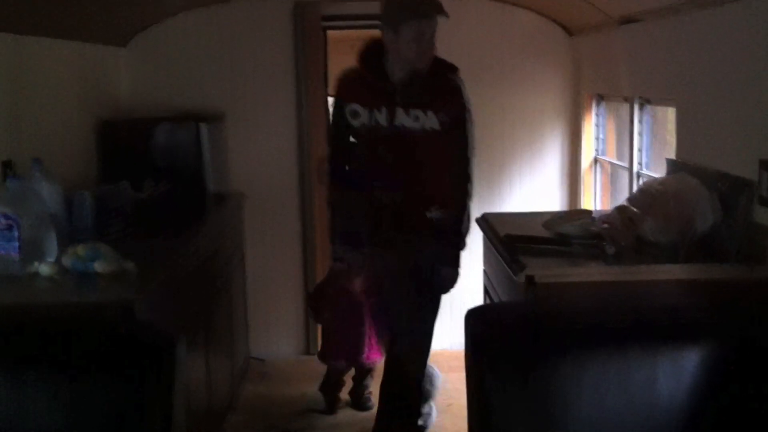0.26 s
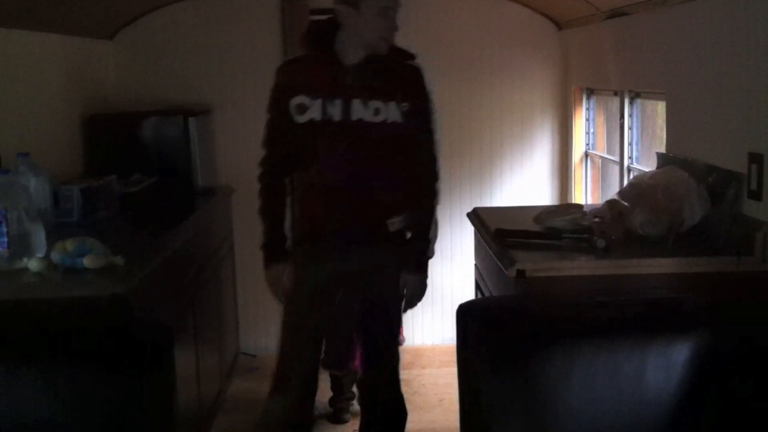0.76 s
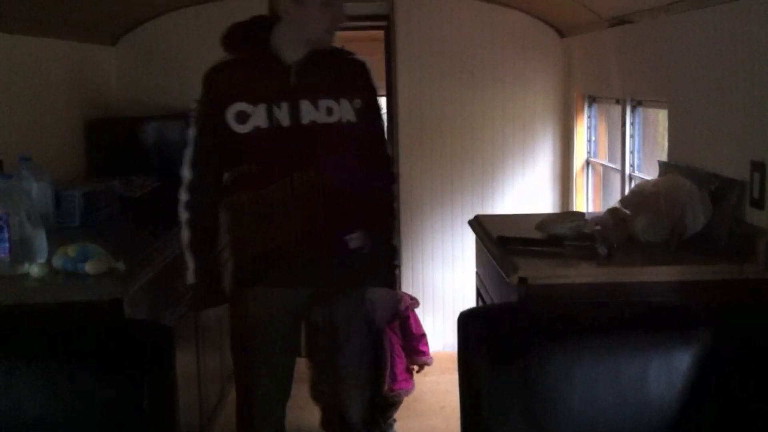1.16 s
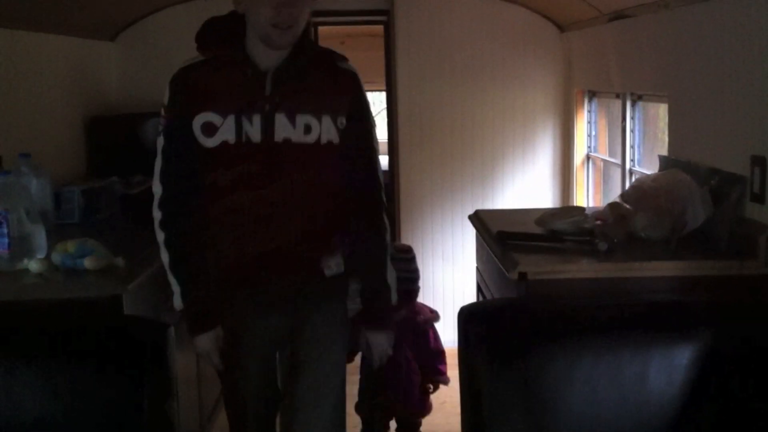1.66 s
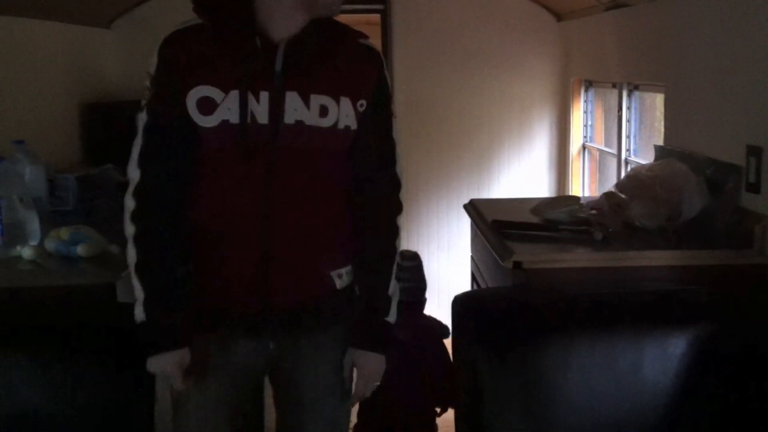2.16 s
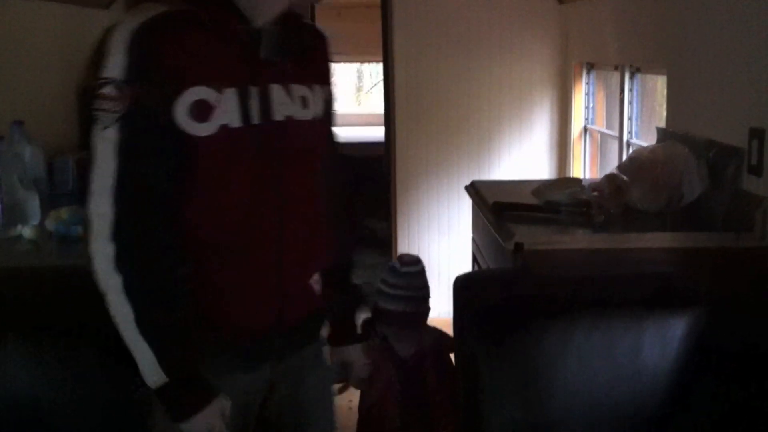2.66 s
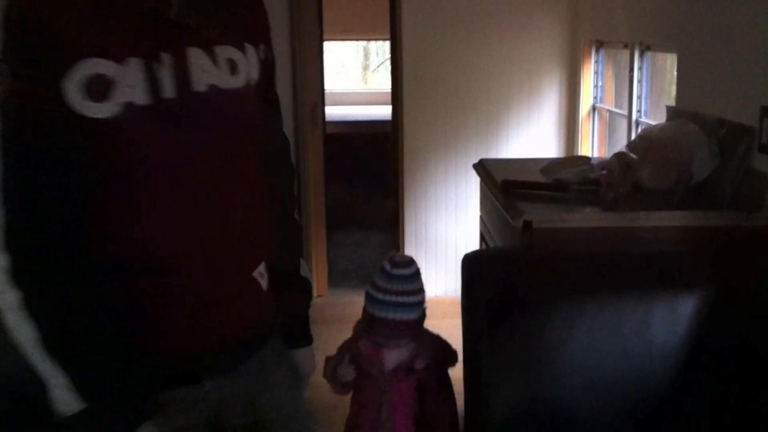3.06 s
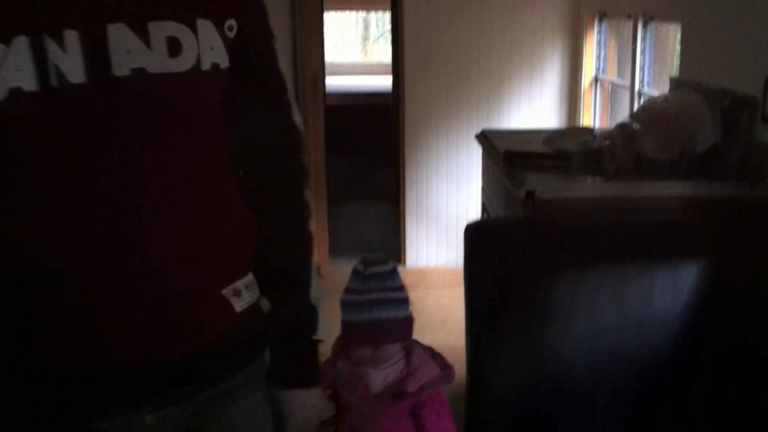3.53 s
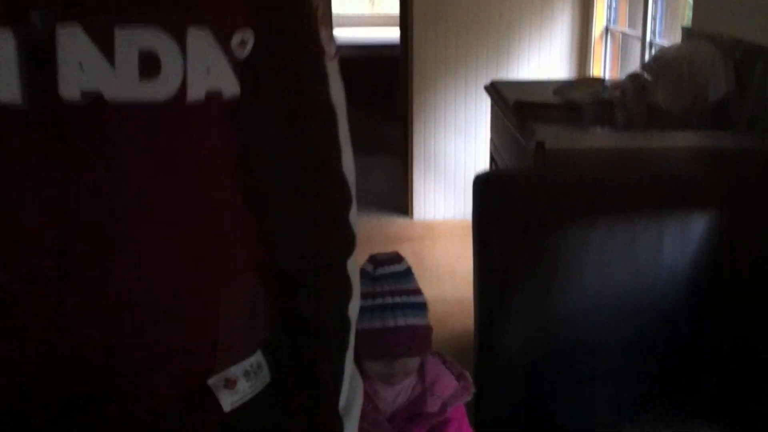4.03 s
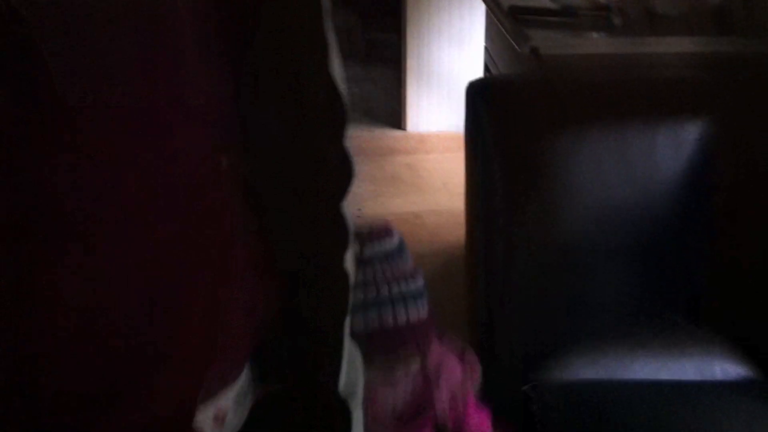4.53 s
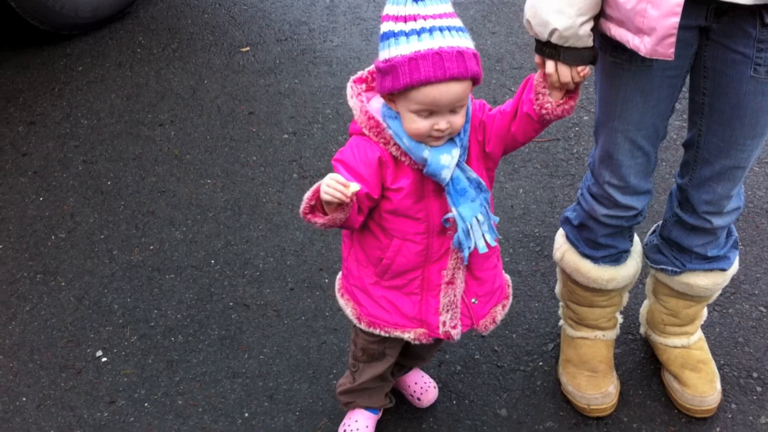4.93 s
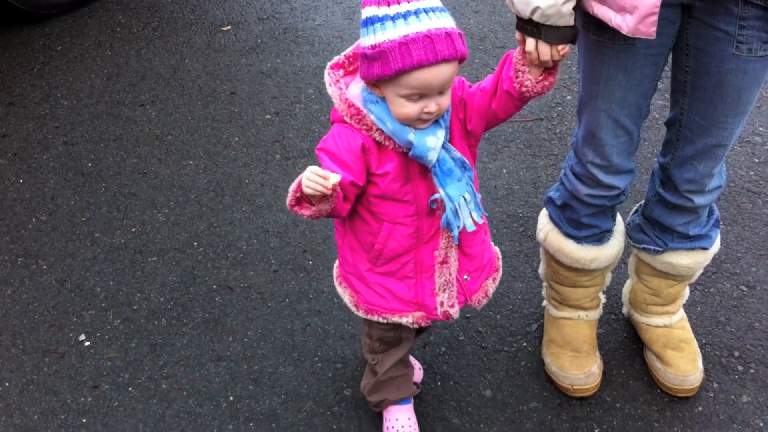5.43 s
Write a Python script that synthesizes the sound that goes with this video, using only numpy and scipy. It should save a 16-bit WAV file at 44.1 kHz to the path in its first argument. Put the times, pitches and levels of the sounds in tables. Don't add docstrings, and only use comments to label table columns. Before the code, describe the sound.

Inside a small wooden cabin, a toddler's hard little shoes trot toward a fixed microphone, clicking and knocking on hollow planks, with short wall ring. A heavier walker shifts softly alongside, and one rubber sole squeaks faintly early on. Steps grow louder until an abrupt cut near the end to very quiet outdoor hush, with a tiny far peep and small stones crackling under a dragging shoe.

```python
import sys
import numpy as np
from scipy import signal
from scipy.fft import rfft, irfft, next_fast_len
from scipy.io import wavfile
from scipy.ndimage import uniform_filter1d

SR = 44100
rng = np.random.default_rng(int(sys.argv[2]) if len(sys.argv) > 2 else 0)


def voltage_ratio(level):
    return 10 ** (np.asarray(level, float) / 20)


def transcribe(signal):
    frames = np.atleast_2d(signal).T
    limited = np.clip(frames, -1, 1)
    pcm = np.round(limited * 32767).astype(np.int16)
    wavfile.write(sys.argv[1], SR, pcm)


N = 251236

# start_s, level_db
CABIN_LEVEL = [(0.0, -62.5), (0.9, -65), (1.8, -61.5), (2.05, -57), (2.3, -58.5), (2.65, -64.5),
               (2.95, -57.5), (3.3, -60), (4.8, -57.5)]
# pitch_hz, level_db (per Hz)
CABIN_COLOUR = [(24, -75), (40, -37), (124, -3), (155, -6), (570, -13.5), (680, -7.5), (852, -12),
                (1520, -10.5), (1850, -11), (2380, -11.5), (16000, -25.5)]
# pitch_hz, level_db (per Hz)
OUTSIDE_COLOUR = [(24, -81), (40, -47), (81, -12), (159, -1.5), (770, -10), (942, -6.5), (1850, -12),
                  (2050, -14), (2260, -13.5), (3650, -17.5), (16000, -30.5)]
# start_s, length_s, first_hz, last_hz, level_db
PEEP = [
    (5.182, .011, 2040, 2015, -58.5),
]
# start_s, peak_db, body_db, edge_db
STONES = [(5.3104, -42, -5.5, -3), (5.317, -45, -5, 2), (5.3224, -44, -2.5, -2.5), (5.3722, -43, 2, 1),
          (5.39, -54, -5, 0.1), (5.421, -51.5, 7, -8), (5.429, -51, 2.5, -8), (5.4545, -49, -5, -7),
          (5.475, -42.5, -13, -4.5), (5.4854, -46, -6, -13), (5.5064, -56, -11, -3),
          (5.5194, -37.5, -11, -4), (5.5247, -42, -15, -9), (5.532, -51, -11, -3), (5.58, -40.5, -5, -31)]
# start_s, length_s, first_hz, last_hz, level_db
SLIPS = [
    (1.133, .018, 9700, 10600, -56),
    (1.18, .048, 11150, 9750, -49.5),
    (1.226, 0.021, 9750, 9520, -47.5),
    (1.25, .03, 12400, 11100, -60),
    (1.262, .012, 10500, 10350, -57),
    (1.274, 0.0179, 10700, 10200, -55),
    (1.285, 0.0091, 9350, 9300, -57),
    (1.307, 0.012, 9300, 9300, -68),
]
# start_s, peak_db, pitch_hz, scuff_db
SOFT_STEPS = [(0.019, -60, 183, 10), (0.361, -36.5, 144, -12), (0.418, -48.5, 113, 4.5),
              (0.466, -42, 142, 0.1), (0.798, -60, 198, -4), (1.269, -43.5, 227, -12),
              (1.919, -57.5, 280, 14), (1.983, -37, 210, -13), (2.399, -45, 220, -10),
              (3.948, -43, 217, -12), (4.183, -29, 350, -15), (4.211, -40.5, 303, -13),
              (4.297, -42, 378, -2), (4.378, -22.5, 154.4, -17), (4.639, -36, 380, -15),
              (4.879, -40.5, 120, -3), (4.894, -33.5, 243.4, -9)]
# start_s, blow_db, plank_hz, upper_plank_hz, hardness_db
HEEL_BLOWS = [(0.3025, -31.5, 880, 2900, -4), (0.7166, -42.5, 700, 2880, -4.5),
              (1.1072, -42, 740, 2490, -3), (1.1507, -19, 750, 1420, -5), (1.4728, -19.5, 1253, 2950, -2),
              (1.7899, -19.5, 670, 1330, 3.5), (2.0658, -17, 620, 2840, 0),
              (2.3273, -21.5, 1075, 1245, -2.5), (2.6026, -20.5, 585, 2730, 0.2),
              (2.8593, -11, 1100, 1890, -1.2), (3.1104, -17, 447, 3300, 5), (3.3848, -10, 1150, 2650, 7),
              (3.6392, -18, 430, 1500, 2.5), (3.899, -14.5, 880, 1517, 1.6), (4.1203, -16.5, 876, 1680, -1),
              (4.357, -13, 906, 1820, 2.1), (4.5897, -17.5, 427, 3190, 7), (4.8319, -19.5, 742, 3170, 1.5)]
# thump_db, thump_hz, knock_db (under the blow), knock_hz, joist_db
FLOOR_ANSWERS = [(-48, 153.5, -18, 387, -52), (-53, 210, -5, 390, -81), (-52, 120, -16, 315, -63),
                 (-40.5, 157.6, -9, 700, -69), (-36.5, 160, -8.5, 510, -66), (-44, 280, -10.5, 340, -47),
                 (-39, 260, -11, 400, -44.5), (-34.5, 221, -9, 600, -39.5), (-39.5, 205, -4.5, 390, -43),
                 (-44, 190, -10, 570, -40), (-39.5, 258, -10, 435, -49), (-40, 220, -14, 670, -45.5),
                 (-31.5, 260, -9.5, 330, -51), (-17.5, 205, -8, 415, -68), (-28.5, 205, -7.5, 418, -51.5),
                 (-28.5, 201, -6, 940, -71), (-33.5, 184, -2, 412, -58), (-34.5, 210, -6.5, 446, -67)]
# pitch_hz, level_db
HEEL_COLOUR = [(40, -35), (90, -1), (200, 9.5), (700, 3), (1800, -2), (3200, -3.5), (5000, -14.5),
               (7500, -21.5), (16000, -31)]
# pitch_hz, level_db
CLICK_COLOUR = [(100, -35), (600, -5.5), (1100, -6), (1900, -12), (3000, -1), (4500, -8.5), (6500, -22),
                (9000, -47), (16000, -49)]
# pitch_hz, t60_s, rise_s
RING_BANDS = [(95, 0.16, 0.017), (212, 0.31, 0.0024), (580, 0.2, 0.0024), (1620, 0.33, 0.0018),
              (3520, 0.31, 0.0015), (8900, .3, 0.0027)]
# pitch_hz, level_db, t60_s
BOARD_MODES = [(152.4, -9.5, 0.25), (197.6, -5.5, 0.13), (392.5, -8.5, 0.18), (663, -1, 0.16),
               (911, -0.5, 0.1), (1150, -22, 0.052), (1566, -3.5, 0.27), (1864, -4.5, 0.24), (2650, 3, 0.1)]

RING_SAMPLES = 16384
T = np.arange(RING_SAMPLES) / SR
RING_HZ = np.fft.rfftfreq(RING_SAMPLES, 1 / SR)

CUT_S, JOIN_S, FADE_IN_S = 4.917, 5.002, 0.088
LEFTOVER_DB, OUTSIDE_DB = -56, -57.5
STONE_T60_S = 0.015
SLIP_IN_S, SLIP_OUT_S = 0.006, 0.008
THUMP_CYCLES, THUMP_RISE_S = 29.8, 0.0074
KNOCK_CYCLES = 48.4
BOOM_SHARE = 0.57
DULL_PER_DB, LONG_PER_DB = 0.49, 0.03
USUAL_DB, PLANK_DB, UPPER_DB = -19, -7, -20


def along(points, hz):
    f, v = np.transpose(points)
    return np.interp(np.log(hz + 1), np.log(f + 1), v)


def curve(rows):
    s, *cols = np.transpose(rows)
    return [np.interp(np.arange(N) / SR, s, c) for c in cols]


def unit(x):
    return x / np.sqrt(np.mean(x ** 2) + 1e-20)


def hiss(spectrum, count):
    size = next_fast_len(count)
    hz = np.fft.rfftfreq(size, 1 / SR)
    white = rfft(rng.standard_normal(size))
    return unit(irfft(white * voltage_ratio(along(spectrum, hz)), size)[:count])


def causal(x, gain_db):
    cep = irfft(gain_db * np.log(10) / 20)
    half = len(cep) // 2 - 1
    cep = cep * np.r_[1, 2 * np.ones(half), 1, np.zeros(half)]
    return irfft(rfft(x) * np.exp(rfft(cep)), len(x))


def mode(hz, t60, rise):
    return np.sin(2 * np.pi * hz * T) * voltage_ratio(-60 * T / t60) * (1 - np.exp(-T / rise)) ** 2


def add(track, s, sound):
    track[round(s * SR):][:len(sound)] += sound


def swell(s, attack, hold, release, db):
    corners = np.cumsum([s, attack, hold, release])
    shape = np.interp(np.arange(N) / SR, corners, [0, 1, 1, 0])
    return voltage_ratio(db) * shape ** 2


def unsteady():
    return hiss([(1, -10), (120, 1.5), (300, -58)], N)


def whistle(s, length, first_hz, last_hz, db, flutter):
    hz = np.interp(np.arange(N) / SR, [s, s + length], [first_hz, last_hz])
    hz = hz * (1 + 0.005 * np.roll(flutter, 999))
    size = swell(s - SLIP_IN_S, SLIP_IN_S, length, SLIP_OUT_S, db) * voltage_ratio(2.6 * flutter)
    return np.sqrt(2) * size * np.sin(2 * np.pi * np.cumsum(hz) / SR)


def cabin_ring(stretch=1):
    noise = rfft(rng.standard_normal(RING_SAMPLES))
    out = np.zeros(RING_SAMPLES)
    for k, (_, t60, rise) in enumerate(RING_BANDS):
        share = along([(row[0], float(j == k)) for j, row in enumerate(RING_BANDS)], RING_HZ)
        band = irfft(noise * share, RING_SAMPLES)
        scatter_db = 3.17 * hiss([(1, 3.5), (50, -8.5), (110, -34.5)], RING_SAMPLES)
        out += band * voltage_ratio(scatter_db - 60 * T / (t60 * stretch)) * (1 - np.exp(-T / rise))
    return out


def air(spectrum, level_db):
    waver_db = 0.7 * hiss([(1, 0), (12, 0), (30, -60)], N)
    return voltage_ratio(level_db + waver_db) * hiss(spectrum, N)


def peep():
    return whistle(*PEEP[0], 0.2 * unsteady())


def grit():
    track, count = np.zeros(N + SR), 4096
    t = T[:count]
    for s, db, body_db, edge_db in STONES:
        burst = hiss([(1500, -7), (3000, -1), (6000, 1), (8000, -26)], count)
        edge = hiss([(6000, -20), (8000, 6), (16000, -7)], count)
        body = hiss([(900, -35), (1600, 8), (2300, -10), (3500, -32)], count)
        fall = voltage_ratio(-60 * t / STONE_T60_S) + 0.9 * voltage_ratio(-60 * t / 0.0013)
        crack = voltage_ratio(-5.0) * burst + voltage_ratio(edge_db + 0.5) * edge + voltage_ratio(body_db) * body
        add(track, s, voltage_ratio(db - 2.5) * fall * crack)
    drag = swell(s=5.29, attack=0.026, hold=0.205, release=0.04, db=-59)
    drag = drag * voltage_ratio(3.8 * hiss([(1, -2), (60, -7), (150, -35)], N))
    scrape = hiss([(900, -26), (1600, 8.5), (2500, -4), (9000, -7), (12500, -10), (16000, -17)], N)
    return track[:N] + drag * scrape


def squeak():
    flutter = unsteady()
    rub = swell(s=1.115, attack=0.054, hold=0.12, release=0.084, db=-55.5)
    rub = rub * voltage_ratio(1.5 * hiss([(1, 0), (50, -5), (120, -36)], N))
    rub = rub * hiss([(7000, -24), (8800, -1), (10500, 3), (12200, -5), (13300, -30)], N)
    return rub + sum(whistle(*row, flutter) for row in SLIPS)


def soles():
    track = np.zeros(N + SR)
    for s, db, pitch_hz, scuff_db in SOFT_STEPS:
        tone = [(70, -41), (150, 7), (450, 3.5),
                (900, scuff_db - 6), (2500, scuff_db - 8.5), (16000, scuff_db - 26)]
        puff = causal(cabin_ring(0.76), along(tone, RING_HZ))
        add(track, s, voltage_ratio(db + 2.5) * mode(pitch_hz, 0.12, 0.0069) + voltage_ratio(db + 4) * puff)
    return track[:N]


def thumps():
    track = np.zeros(N + SR)
    for (db, hz, knock_db, _, joist_db), (s, blow_db, plank_hz, *_) in zip(FLOOR_ANSWERS, HEEL_BLOWS):
        hollow = voltage_ratio(db + 4) * mode(hz, THUMP_CYCLES / hz, THUMP_RISE_S)
        plank = mode(plank_hz, 0.039, 0.00036)
        plank = plank + 0.42 * mode(plank_hz * rng.normal(1, 0.064), 0.11, 0.0013)
        sag = voltage_ratio(joist_db - 12.0) * mode(32, 0.13, 0.01)
        add(track, s, hollow + voltage_ratio(blow_db + 0.53 * knock_db + PLANK_DB) * plank + sag)
    add(track, CUT_S - 0.009, voltage_ratio(-44) * mode(35, 0.3, 0.003))
    return track[:N]


def heel_click(colour_db):
    click = np.zeros(RING_SAMPLES)
    delays = np.r_[0, 0.002, rng.uniform(0.004, 0.025, 5)]
    sizes = np.r_[1, 0.55, 0.4 * rng.uniform(-1, 1, 5)]
    click[(delays * SR).astype(int)] = -sizes * voltage_ratio(-60 * delays / 0.12)
    return causal(click, colour_db)


def heels():
    track, hz = np.zeros(N + SR), RING_HZ
    for blow, answer in zip(HEEL_BLOWS, FLOOR_ANSWERS):
        s, db, plank_hz, upper_hz, hard_db = blow
        thump_db, _, knock_db, knock_hz, joist_db = answer

        boom_db = BOOM_SHARE * (thump_db - db) + 3
        slap_db = 1.0 - DULL_PER_DB * (db - USUAL_DB)
        tilt = [(200, boom_db), (430, -3.5 - 0.54 * hard_db), (750, 0.1), (1300, 0),
                (3500, 0.24 * slap_db), (7000, slap_db)]
        tone_db = along(HEEL_COLOUR, hz) + along(tilt, hz)
        tone_db += 0.74 * (knock_db + 15) / (1 + (np.log(hz / knock_hz + 1e-9) / 0.19) ** 2)
        plank_db = 9 / (1 + ((hz - plank_hz) / 110) ** 2) + 8 / (1 + ((hz - upper_hz) / 170) ** 2)
        clumps_db = 2.7 * unit(uniform_filter1d(rng.standard_normal(len(hz)), size=80))

        stretch = 1.0342 + LONG_PER_DB * max(USUAL_DB - db, 0)
        walls = causal(cabin_ring(stretch), tone_db + 0.27 * plank_db)
        rattle = causal(cabin_ring(0.36), tone_db + plank_db + clumps_db)
        sound = voltage_ratio(db - 5) * walls + voltage_ratio(db - 7.5) * rattle
        boards = sum(voltage_ratio(level + rng.normal(0, 2.7)) * mode(f * rng.normal(1, 0.0312), t60, 0.009)
                     for f, level, t60 in BOARD_MODES)
        sound += voltage_ratio(db - 18.5) * boards
        sound += voltage_ratio(db + knock_db - 2.0) * mode(knock_hz, KNOCK_CYCLES / knock_hz, 0.0029)
        sound += voltage_ratio(db + hard_db + UPPER_DB) * mode(upper_hz, 0.067, 0.001)
        sound += voltage_ratio(joist_db + 9.5) * mode(103 * rng.normal(1, 0.024), 0.24, 0.019)
        add(track, s - 0.0006, sound)

        click = heel_click(along(CLICK_COLOUR, hz) + 0.26 * plank_db)
        add(track, s + 0.001224, voltage_ratio(db + hard_db + 18.5) * click)
    return track[:N]


def scene():
    t = np.arange(N) / SR
    cabin = air(CABIN_COLOUR, curve(CABIN_LEVEL)[0] + 2) + squeak() + soles() + thumps() + heels()
    fade_in = np.clip((t - JOIN_S) / FADE_IN_S, 0.06, 1)
    fade = np.where(t < JOIN_S, voltage_ratio(LEFTOVER_DB - OUTSIDE_DB), fade_in)
    outside = fade * air(OUTSIDE_COLOUR, OUTSIDE_DB) + peep() + grit()
    return np.where(t < CUT_S, cabin, outside)[None]


def band_limit(x):
    return signal.sosfilt(signal.butter(12, 16650, fs=SR, output="sos"), x)


def record(dry):
    gain, size = np.ones(N), next_fast_len(N)
    for s, db, *_ in HEEL_BLOWS:
        dip_db = -np.clip(1.8 * (db + 21), 0, 40)
        gain[round((s - 0.012) * SR):round((s - 0.002) * SR)] = voltage_ratio(dip_db)
    drift = voltage_ratio(-109) * hiss([(10, -20), (35, 3), (60, -28)], N)
    mix = dry * uniform_filter1d(gain, size=30) + drift
    top_cut = voltage_ratio(along([(15750, 0), (15950, -30)], np.fft.rfftfreq(size, 1 / SR)))
    mix = irfft(rfft(mix, size) * top_cut, size)[:, :N]
    return band_limit(mix)


dry = scene()
out = record(dry)
transcribe(out)
```